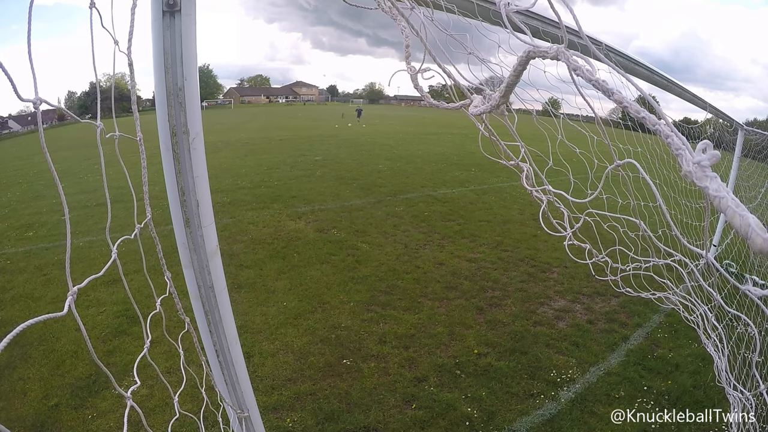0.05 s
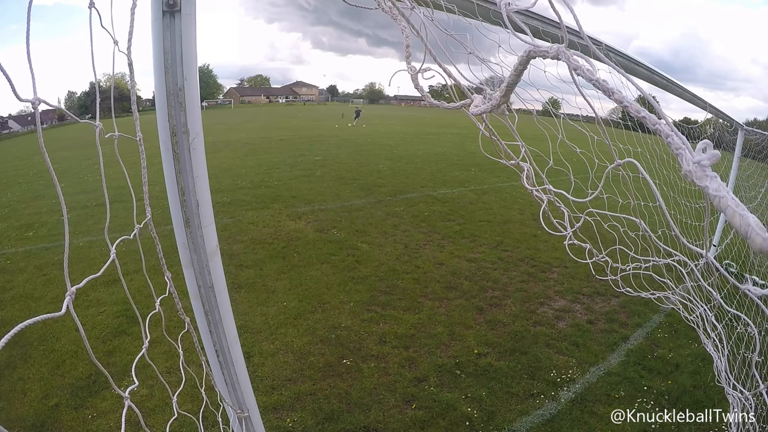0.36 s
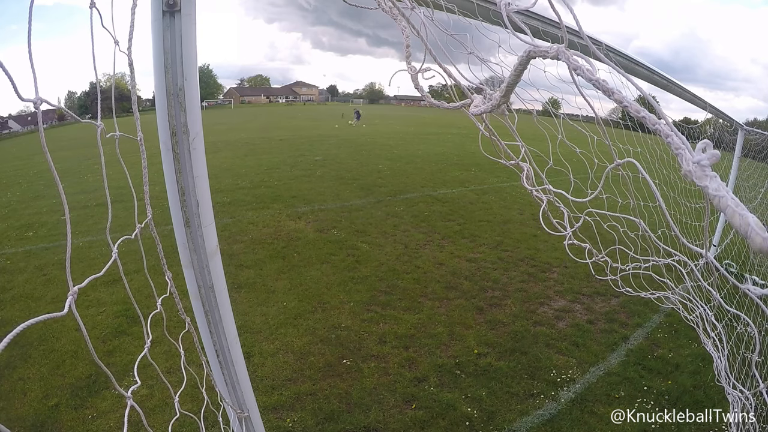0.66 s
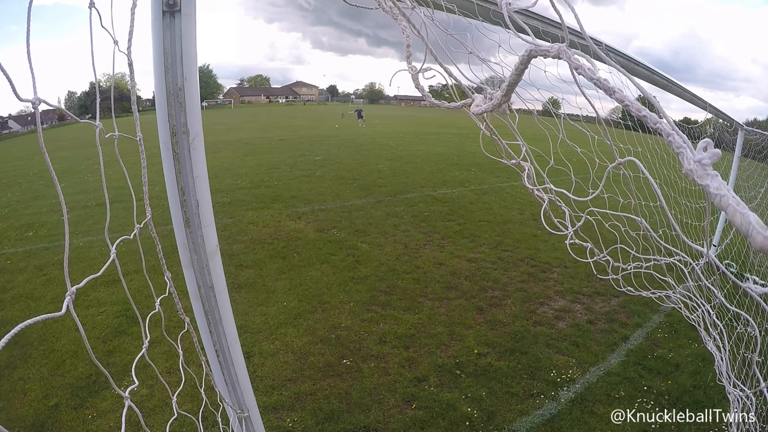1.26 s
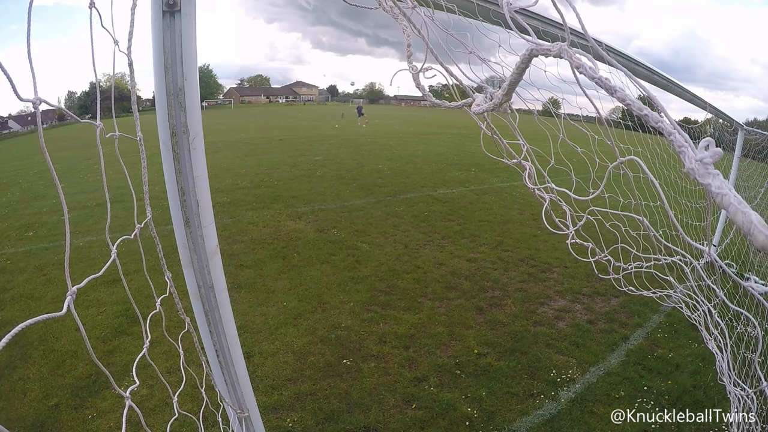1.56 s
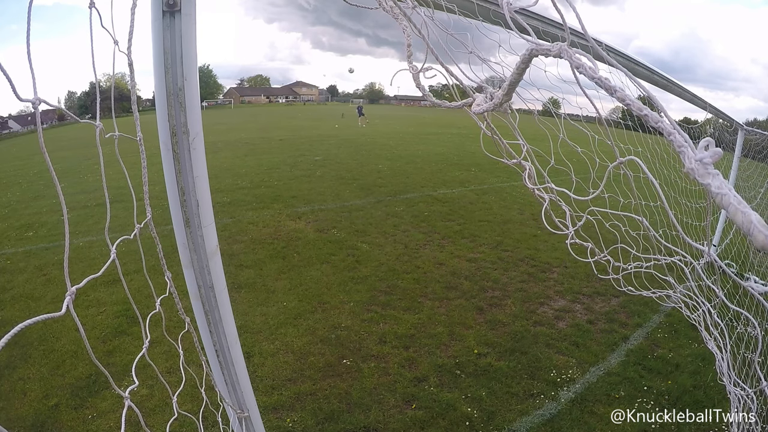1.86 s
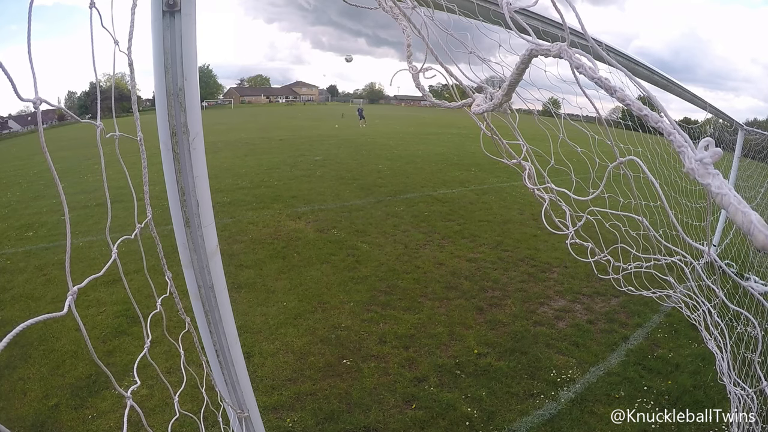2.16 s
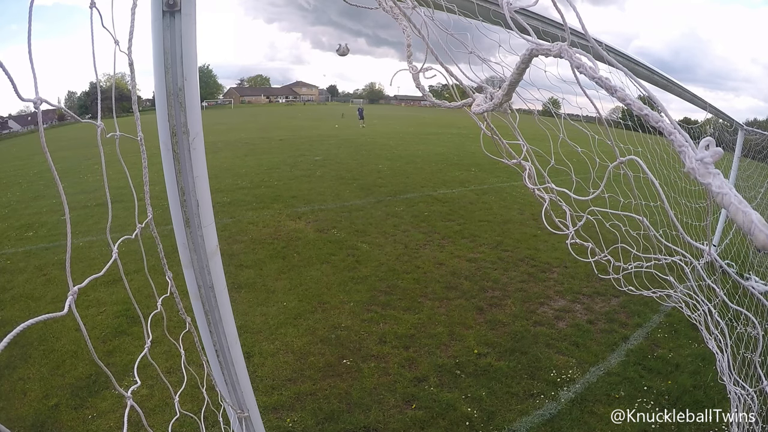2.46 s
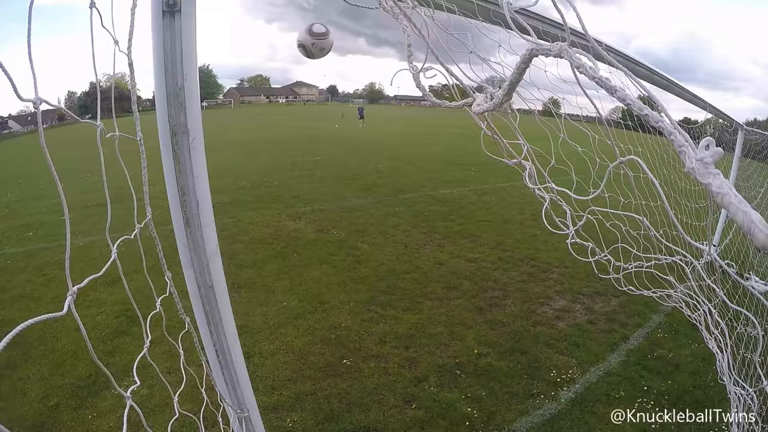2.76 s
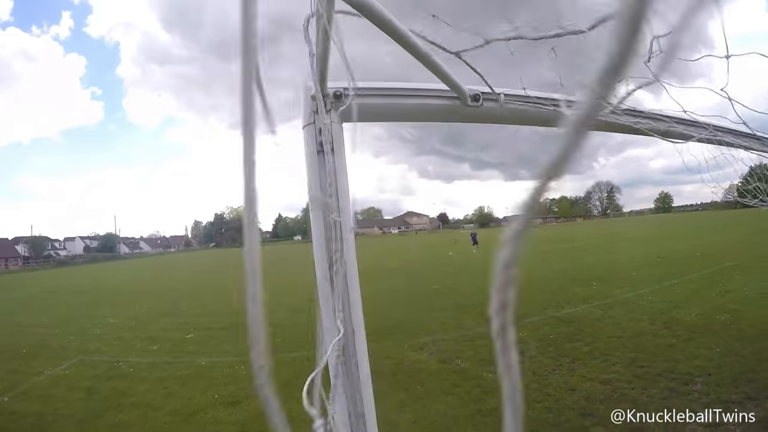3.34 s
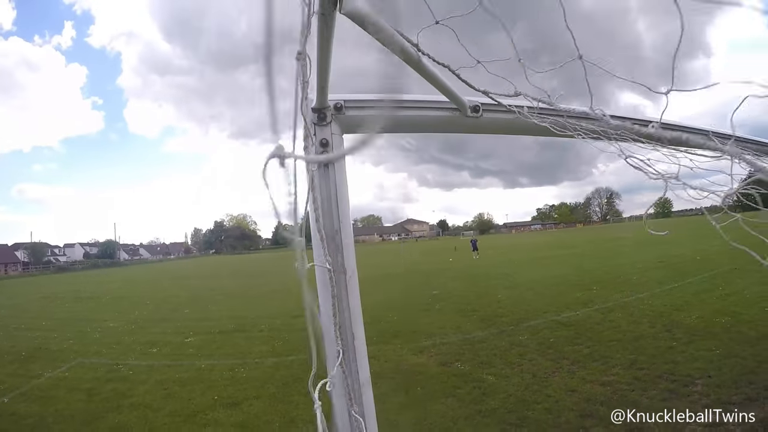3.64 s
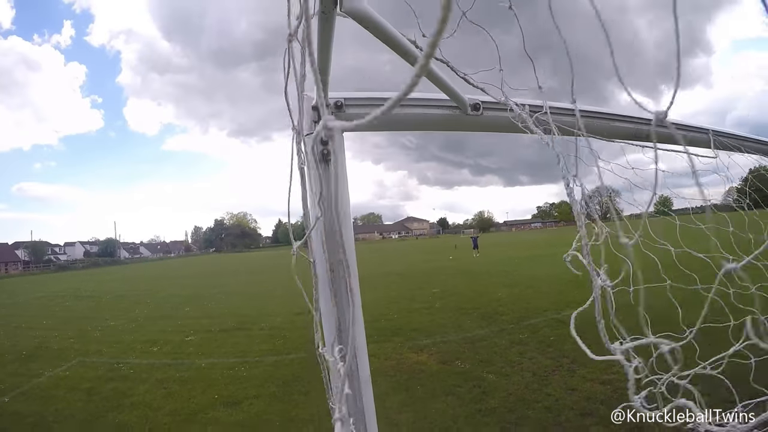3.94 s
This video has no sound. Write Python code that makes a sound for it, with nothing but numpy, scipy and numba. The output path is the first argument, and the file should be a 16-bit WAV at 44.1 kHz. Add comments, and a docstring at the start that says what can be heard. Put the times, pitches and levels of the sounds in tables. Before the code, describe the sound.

A football slams into a goal net right at the microphone, booming and rattling.

```python
"""A windy field, heard from the microphone of a small camera hung in a goal net; the camera whines faintly.
Far out, a boot brushes the grass and kicks a football, and the kick echoes back. A far bird whistles once.
Near three seconds the ball flies into the net, right on the camera: it booms, and the mount shudders and
knocks back, overloading the microphone. Cords scrape and tick on the housing as the net settles."""
import sys
import numpy as np
from scipy import signal
from scipy.fft import rfft, irfft
from scipy.io import wavfile
from scipy.ndimage import uniform_filter1d
from numba import njit

SR = 44100
rng = np.random.default_rng(int(sys.argv[2]) if len(sys.argv) > 2 else 0)


def materialize(psi):
    """Save the field psi as 16-bit PCM at rate SR to the path in sys.argv[1].

    A 1-D psi becomes a single channel; in a 2-D psi each row is a channel.
    """
    bounded = np.clip(np.atleast_2d(psi).T, -1, 1)
    quanta = np.round(bounded * 32767).astype(np.int16)
    wavfile.write(sys.argv[1], SR, quanta)


N = 176400  # 4 s

# Distant hush of the open field. Each row: frequency in Hz, relative level in dB.
HUSH_COLOUR = [(59, -22.5), (100, 2), (139, -12.5), (203, -4.5), (281, -12.5), (442, -16), (511, -16.5),
               (658, -18.5), (1660, -30), (1780, -31.5), (3070, -34.5), (3750, -39), (4410, -38),
               (4660, -40.5), (7600, -45.5), (9880, -82), (16700, -120)]
# Wind on the microphone, before its gusts. Each row: time in seconds, level in dB.
WIND_LEVELS = [(0, -53.5), (.25, -49.5), (.5, -44), (.75, -46), (1.0, -42.5), (1.3, -42.5), (1.65, -46.5),
               (1.9, -46.5), (2.2, -51), (2.5, -47.5), (2.8, -49), (2.93, -41.5), (3.18, -24),
               (3.33, -35.5), (3.55, -40), (3.99, -48.5)]
# Low rumble of that wind. Each row: frequency in Hz, relative level in dB.
WIND_RUMBLE_COLOUR = [(10, -13), (28, 4), (55, -3.5), (100, -15.5), (160, -23), (400, -49.5), (2000, -80)]

# The ball ringing far out on the field. Each row: frequency in Hz, relative level in dB, t60 in seconds.
BALL_MODES = [(135, 5, 0.075), (199, 2, 0.08), (328, -14, 0.077)]
# The boot on grass and ball. Each row: frequency in Hz, relative level in dB.
BOOT_COLOUR = [(100, -23), (400, 0), (900, -1.5), (1450, 4.5), (1900, -19), (2400, -4), (3500, -16.5),
               (5500, -31), (7000, -20), (8000, -49.5)]
# The kick returning from houses and trees. Each row: frequency in Hz, relative level in dB.
KICK_ECHO_COLOUR = [(200, -5), (1200, 7), (3200, 0), (4500, -13), (8000, -28)]

# The camera's shell, around the microphone. Each row: frequency in Hz, relative level in dB, t60 in seconds.
SHELL_MODES = [(1420, -6.5, 0.18), (1770, -8, 0.02), (2168, 3.5, .08), (2430, -1, .08), (2550, -3.5, .06),
               (2630, -6, .06), (3010, -3, .05), (4430, -11, .04)]
# Rumble of the stretched net. Each row: time in seconds, level in dB.
STRAIN_LEVELS = [(2.88, -110), (2.92, -59), (2.941, -68.5), (2.95, -3.5), (2.985, 10), (3.025, -5.5),
                 (3.06, -11), (3.11, -15), (3.135, -24), (3.2, -29), (3.3, -36.5), (3.42, -35.5),
                 (3.48, -52), (3.99, -46.5)]
# Faint hums of the taut net. Each row: start in seconds, length in seconds, pitch in Hz, level in dB.
NET_HUMS = [(3.23, 0.23, 205, -35.5), (3.55, 0.2, 205, -50), (3.823, 0.53, 414.5, -46)]
# Cords sliding over the housing. Each row: time in seconds, level in dB.
SLIDE_LEVELS = [(2.9, -110), (2.94, -70.5), (2.948, -22), (2.978, -9), (3.0, -15.5), (3.045, -21.5),
                (3.06, -65), (3.068, -22), (3.1, -17.5), (3.135, -31.5), (3.145, -22), (3.17, -28.5),
                (3.205, -42), (3.29, -43), (3.35, -49.5), (3.44, -39.5), (3.47, -59.5), (3.99, -65)]
# Separate rubs as the net settles. Each row: start and length in seconds, scratch and hiss levels in dB.
CORD_RUBS = [(3.358, .065, -35, -53), (3.478, 0.094, -50, -66.5), (3.572, 0.087, -51.5, -72.5),
             (3.681, 0.04, -48, -65), (3.734, 0.061, -58, -72), (3.81, 0.086, -52.5, -59),
             (3.899, 0.096, -54, -57)]
# Scratch of the slipping cords. Each row: frequency in Hz, relative level in dB.
SCRATCH_COLOUR = [(150, -10), (600, -4.5), (1200, 5), (1600, -0.5), (2000, 1.5), (2650, 3.5), (3300, -8.5),
                  (4500, -16.5), (6000, -20.5), (7500, -23), (9000, -33.5)]
# Hiss of the rubbing cords. Each row: frequency in Hz, relative level in dB.
RUB_HISS_COLOUR = [(1000, -24.5), (3300, -12), (4400, 3), (5500, -1.5), (8000, -19.5)]
# Cords snapping against the housing. Each row: start in seconds, level in dB, rise and decay in seconds,
# ring pitch in Hz, ring level in dB relative to the snap.
CORD_SNAPS = [(3.1168, -6, 0.00094, .0025, 2685, -8.5), (3.147, -0.5, 0.0025, 0.0036, 3098, -10),
              (3.156, -10, 0.0007, 0.0052, 2300, 5.5), (3.1817, -11.5, 0.00072, 0.0032, 2720, 2),
              (3.2165, -39, 0.00062, 0.0029, 2200, 12.5), (3.2703, -20, .0005, 0.0024, 2500, 2.5),
              (3.3176, -12.5, 0.00015, 0.003, 1364, -3), (3.326, -9, 0.0023, 0.0016, 3310, -1.5),
              (3.4344, -19, 0.00063, 0.004, 2400, 4.5), (3.609, -45, .001, .004, 2024, 5),
              (3.65, -45, 0.0011, .004, 2140, 5), (3.6721, -34, 0.00032, 0.0044, 1064, 3.5),
              (3.692, -48.5, .003, .004, 2010, 14.5), (3.71, -51.5, 0.0028, 0.0039, 3060, 10),
              (3.734, -44, .0005, .002, 2460, -7), (3.7528, -39.5, 0.00046, .003, 3380, -2),
              (3.946, -49, .001, 0.0054, 3960, 11.5)]
# Tick of a snapping cord. Each row: frequency in Hz, relative level in dB.
TICK_COLOUR = [(150, -6.5), (600, -6), (1400, -3.5), (1800, -7), (2400, 2.5), (3300, -4.5), (4100, -10),
               (4700, -12.5), (5800, -16), (7500, -25.5), (9000, -31.5)]

# Pushes of air from the kick, the ball and the swinging camera.
# Each row: start in seconds, pitch in Hz, length in seconds, level in dB.
AIR_PUSHES = [(0.812, 54, 0.04, -12.5), (2.9455, 61, .028, 16.5), (2.978, 68, 0.034, 6.5),
              (3.005, 21, .055, 7.5), (3.077, 42, 0.024, 14), (3.088, 12, .075, 4)]
# Ball and mount shuddering together. Each row: frequency in Hz, relative level in dB, t60 in seconds.
BALL_MOUNT_MODES = [(190, -14, .2), (292, 0, 0.26), (324.6, -5.5, .18), (351.6, -6.5, 0.11),
                    (453.4, -7.5, 0.35), (532.2, -13, .3), (613, -7, 0.28), (724, -17.5, 0.13),
                    (873, -22, 0.2), (1009, -20, .19), (1255, -30, 0.1)]
# The mount ringing against its stop. Each row: frequency in Hz, relative level in dB, t60 in seconds.
MOUNT_STOP_MODES = [(136.3, -2.5, 0.11), (194.4, 1.5, 0.099), (263.5, -4, 0.1), (410, -24.5, 0.033),
                    (495, -18, 0.12), (685, -29, 0.21), (1040, -12.5, .04)]
# Knocks of the mount. Each row: start in seconds, gain in dB.
MOUNT_KNOCKS = [(3.076, 19), (3.2366, -33.5)]
# Hard blows on the housing. Each row: start in seconds, crack level in dB, crack decay in seconds,
# dull body level in dB, body decay in seconds.
HOUSING_BLOWS = [(2.9455, -10.5, 0.0027, -2, 0.0052), (2.965, -17.5, 0.0035, -8, 0.0055),
                 (2.978, 0.5, 0.0024, 0, 0.012), (3.025, -24, .003, -7, .008),
                 (3.0728, 16.5, .0026, 12.5, 0.007), (3.0834, 3.5, 0.003, -1, .008),
                 (3.106, -7, 0.0014, -10.5, .005), (3.235, -52, .003, -11.5, 0.0028)]
# Bright crack of a blow. Each row: frequency in Hz, relative level in dB.
BLOW_CRACK_COLOUR = [(200, -4.5), (1000, 4.5), (2000, -2), (2900, 5.5), (3700, -5.5), (4500, -1.5),
                     (5400, -12), (6200, -6), (7200, -12), (8200, -30)]
# Dull body of a blow, and the net's rumble. Each row: frequency in Hz, relative level in dB.
DULL_COLOUR = [(30, -6), (110, 1), (170, -3), (300, 0), (620, -2), (790, -12), (960, -6.5), (1400, -23.5),
               (3000, -40.5), (8000, -58)]


def undb(db):
    """Decibels to gain."""
    return 10 ** (np.asarray(db) / 20)


def unit(x):
    """Scale to a standard deviation of 1."""
    return x / (np.std(x) + 1e-12)


def since(start):
    """Seconds since a moment, zero before it."""
    return np.maximum(np.arange(N) / SR - start, 0)


def curve(rows):
    """Gain over time from (s, dB) points."""
    times, db = np.array(rows).T
    return undb(np.interp(since(0), times, db))


def swell(start, length):
    """One smooth rise and fall."""
    return np.sin(np.pi * np.minimum(since(start) / length, 1))


def burst(start, rise, decay):
    """Straight rise, exponential fall."""
    return np.minimum(since(start) / rise, 1) * np.exp(-since(start + rise) / decay)


def colour(x, points):
    """Causal filter through (Hz, dB) points that keeps the power of white noise."""
    hz, db = np.array(points).T
    bin_hz = np.arange(N + 1) * SR / (2 * N)
    gain = undb(np.interp(np.log(bin_hz + 1), np.log(hz), db))
    cepstrum = irfft(np.log(gain / np.sqrt(np.mean(gain ** 2))))
    cepstrum[1:N] *= 2  # fold onto positive time: minimum phase
    cepstrum[N + 1:] = 0
    return irfft(rfft(x, 2 * N) * np.exp(rfft(cepstrum)))[:N]


def noise():
    """White noise."""
    return rng.standard_normal(N)


def drift(rate_hz):
    """Smooth random wander with a spread of 1."""
    window = int(SR / rate_hz)
    return unit(uniform_filter1d(uniform_filter1d(noise(), window), window))


def wavering_tone(hz, width_hz):
    """A tone whose pitch wanders over a narrow band."""
    pitch_hz = hz + width_hz / 2 * drift(2 * width_hz)
    return np.sqrt(2) * np.sin(2 * np.pi * np.cumsum(pitch_hz) / SR)


def ring(start, modes):
    """Modes struck once, each falling 60 dB in its t60."""
    t = since(start)
    return sum(undb(db - 60 * t / t60) * np.sin(2 * np.pi * hz * t) for hz, db, t60 in modes)


def field_hush(level_db=-52.5, flicker_db=0.4):
    """The far hush of the field, its level flickering slightly."""
    return colour(noise(), HUSH_COLOUR) * undb(level_db + flicker_db * drift(rate_hz=2.6))


def wind(gust_db=2):
    """Gusts rumble right on the microphone."""
    rumble = colour(noise(), WIND_RUMBLE_COLOUR) * curve(WIND_LEVELS)
    return rumble * undb(gust_db * drift(rate_hz=12))


def far_bird(hz=2120, width_hz=150, level_db=-67.5):
    """One whistle from far off, blurred by its echoes into a narrow band of noise."""
    blur = signal.butter(2, [hz - width_hz / 2, hz + width_hz / 2], "bandpass", fs=SR, output="sos")
    whistle = unit(signal.sosfilt(blur, noise()))
    return undb(level_db) * whistle * swell(start=1.62, length=0.58) ** 2


def camera_whine(pulse_hz=31.2, level_db=-76):
    """The electronics next to the microphone give a faint pulsing whine."""
    pulse = (1 + np.cos(2 * np.pi * pulse_hz * since(0))) / 2
    return undb(level_db) * pulse * wavering_tone(hz=4280, width_hz=25)


def far_kick(kick_s=0.816, scuff_db=-51, slap_db=-39.5, ball_db=-24.5, echo_db=-61):
    """Far out, the run-up brushes the grass, the boot slaps, the ball rings; houses and trees answer."""
    scuff = undb(scuff_db) * swell(start=0.784, length=0.035)
    slap = undb(slap_db) * burst(kick_s - 0.001, rise=0.0015, decay=0.0057)
    echo = colour(noise(), KICK_ECHO_COLOUR) * burst(start=0.885, rise=0.056, decay=0.13)
    boot = colour(noise() * (scuff + slap), BOOT_COLOUR)
    return boot + undb(ball_db) * ring(kick_s, BALL_MODES) + undb(echo_db) * echo


def housing_ring(force, gain_db=-14.5):
    """The shell around the microphone rings under the cords that touch it."""
    response = ring(0, SHELL_MODES)
    response /= np.sqrt(np.sum(response ** 2))
    return undb(gain_db) * signal.fftconvolve(force, response)[:N]


def straining_net(slips_per_s=3300, slip_spread_db=5.5):
    """All around the camera the net rumbles and hums, its cords slipping over the housing in tiny jerks."""
    jerks = (rng.random(N) < slips_per_s / SR) * np.sign(noise())
    strength = undb(slip_spread_db * np.minimum(rng.exponential(size=N), 4))
    rubbing = sum(undb(db) * swell(start, length) for start, length, db, _ in CORD_RUBS)
    friction = unit(jerks * strength) * (curve(SLIDE_LEVELS) + rubbing)
    scratch = colour(friction, SCRATCH_COLOUR) + housing_ring(friction)
    hiss = noise() * sum(undb(db) * swell(start, length) for start, length, _, db in CORD_RUBS)
    hums = sum(undb(db) * swell(start, length) * wavering_tone(hz, width_hz=13)
               for start, length, hz, db in NET_HUMS)
    rumble = colour(noise() * curve(STRAIN_LEVELS), DULL_COLOUR)
    return scratch + colour(hiss, RUB_HISS_COLOUR) + rumble + hums


def cord_snaps():
    """Cords whip against the housing, right at the microphone, each with a short ring of its own."""
    grit = noise()
    force, rings = 0, 0
    for start, db, rise, decay, hz, ring_db in CORD_SNAPS:
        envelope = undb(db) * burst(start, rise, decay)
        force += envelope * grit
        rings += undb(ring_db) * envelope * wavering_tone(hz, width_hz=260)
    return colour(force, TICK_COLOUR) + housing_ring(force) + rings


def air_thumps():
    """Each push of air swings the pressure at the microphone for a cycle or two."""
    return sum(-undb(db) * swell(start, length) * np.sin(2 * np.pi * hz * since(start))
               for start, hz, length, db in AIR_PUSHES)


def ball_shudder(strike_s=2.944, rise_s=0.017, hold_s=0.036, gain_db=9.5, pitch_wobble=0.023):
    """The ball presses in on the mount: their modes swell, waver with the load and die away."""
    t = since(strike_s)
    fading_s = since(strike_s + rise_s + hold_s)
    modes = 0
    for hz, db, t60 in BALL_MOUNT_MODES:
        wobble_s = np.cumsum(pitch_wobble * drift(rate_hz=90) * (t > 0)) / SR
        modes += undb(db - 60 * fading_s / t60) * np.sin(2 * np.pi * hz * (t + wobble_s))
    return undb(gain_db) * np.minimum(t / rise_s, 1) * modes


def mount_knocks():
    """The mount under the camera knocks back against its stop and rings."""
    return sum(undb(db) * ring(start, MOUNT_STOP_MODES) for start, db in MOUNT_KNOCKS)


def housing_blows(body_lag_s=0.0012):
    """Hard blows land on the housing, point-blank: each a crack with a dull body just behind it."""
    crack, body = 0, 0
    for start, crack_db, crack_decay, body_db, body_decay in HOUSING_BLOWS:
        crack += undb(crack_db) * burst(start, rise=0.00013, decay=crack_decay)
        body += undb(body_db) * burst(start + body_lag_s, rise=0.0027, decay=body_decay)
    return colour(noise() * crack, BLOW_CRACK_COLOUR) + colour(noise() * body, DULL_COLOUR)


def scene():
    """Everything as it reaches the one microphone in the net."""
    shot = air_thumps() + far_kick() + ball_shudder() + housing_blows() + mount_knocks()
    net = straining_net() + cord_snaps()
    background = field_hush() + wind() + far_bird() + camera_whine()
    return (shot + net + background)[None]


@njit
def follow(x, attack_s, release_s):
    """Level follower with separate time constants for rising and falling."""
    attack, release = 1 / (attack_s * SR), 1 / (release_s * SR)
    levels, level = np.empty(len(x)), 1e-9
    for i in range(len(x)):
        level += (abs(x[i]) - level) * (attack if abs(x[i]) > level else release)
        levels[i] = level
    return levels


def record(dry):
    """The camera's gain drops at an overload and creeps back; its input clips and cuts the treble."""
    threshold_db, max_duck_db = 2, 16.5
    input_clip, input_band_hz, output_band_hz = 0.92, 7700, 15700
    overload = 1.0 * (np.abs(dry[0]) > undb(threshold_db))
    ducked = dry * undb(-max_duck_db * follow(overload, attack_s=0.003, release_s=1.9))
    input_lowpass = signal.ellip(8, 0.2, 60, input_band_hz, fs=SR, output="sos")
    output_lowpass = signal.ellip(8, 0.2, 70, output_band_hz, fs=SR, output="sos")
    dulled = signal.sosfilt(input_lowpass, np.clip(ducked, -input_clip, input_clip))
    return signal.sosfilt(output_lowpass, np.clip(dulled, -1, 1))  # overshoots clip again at full scale


dry = scene()
out = record(dry)
materialize(out)
```